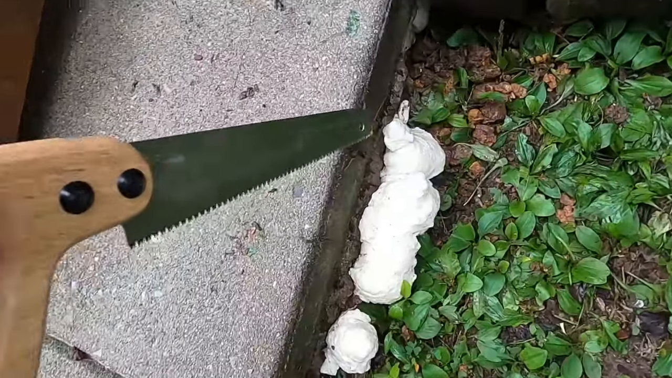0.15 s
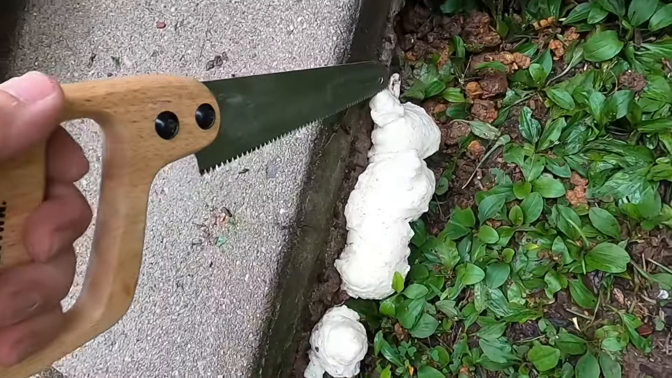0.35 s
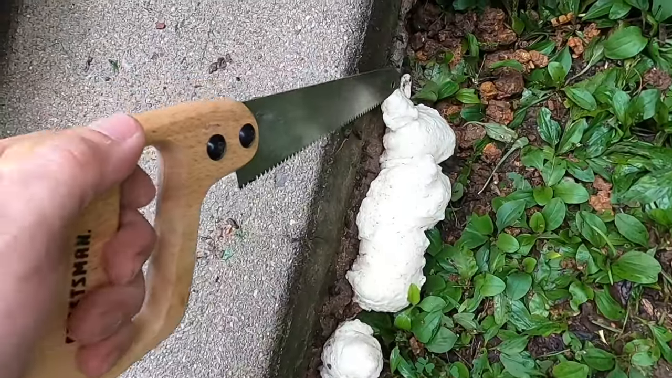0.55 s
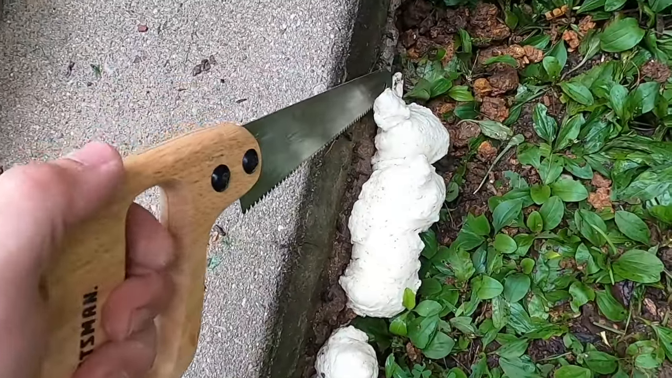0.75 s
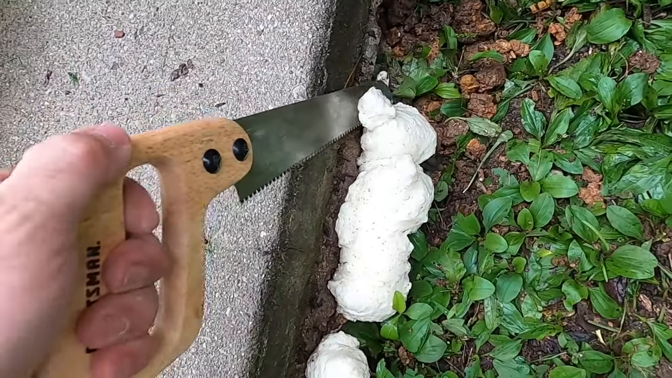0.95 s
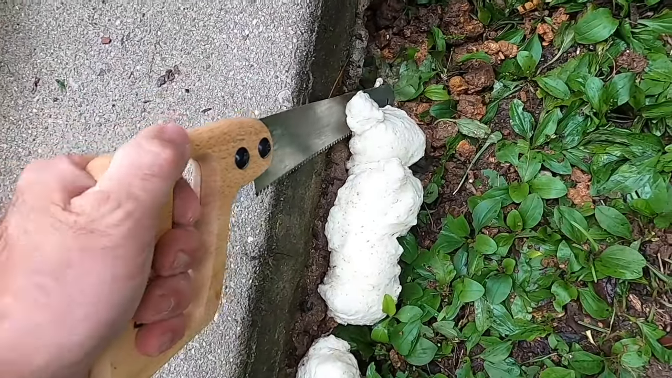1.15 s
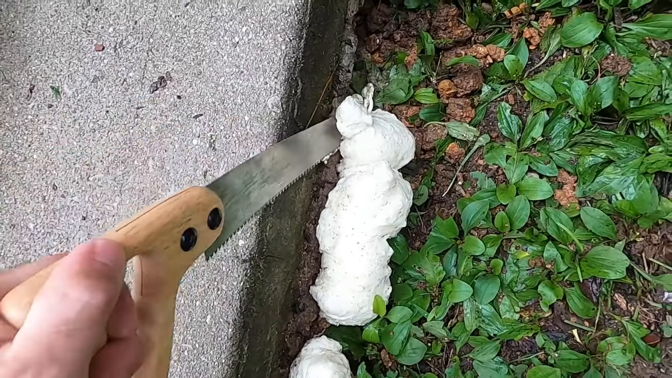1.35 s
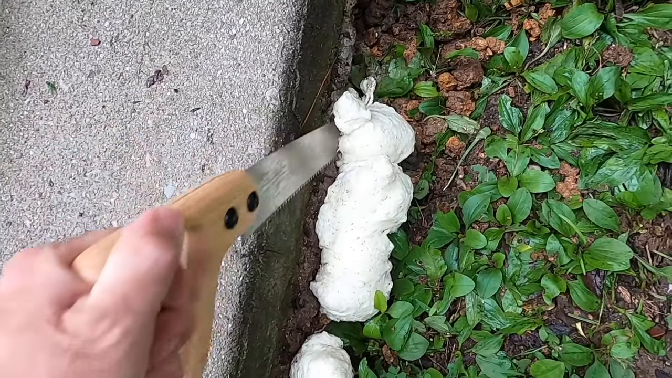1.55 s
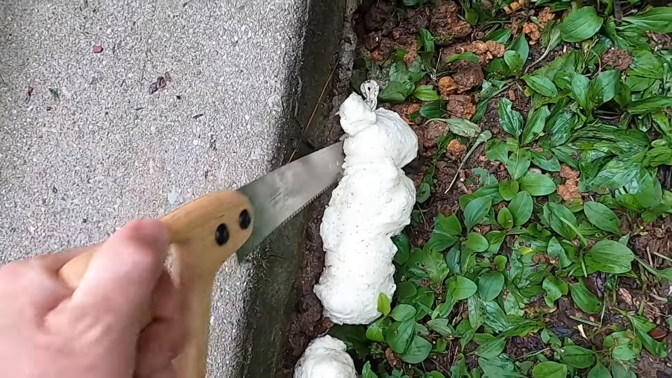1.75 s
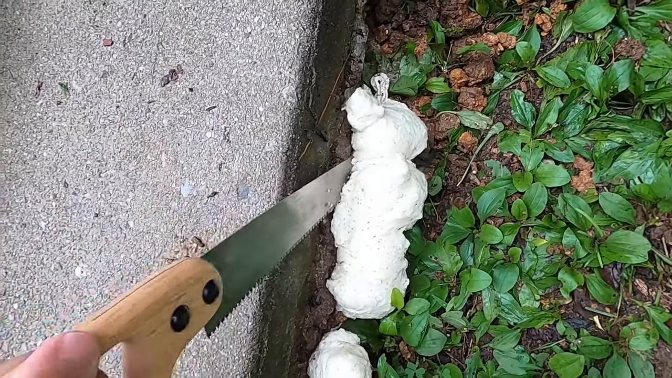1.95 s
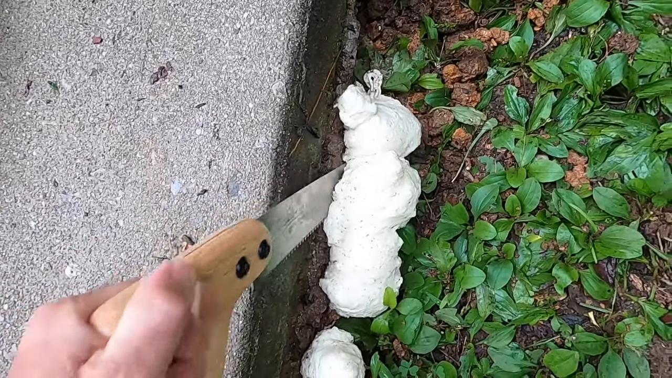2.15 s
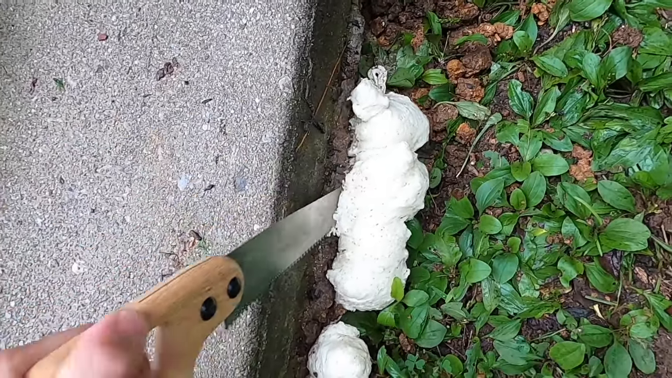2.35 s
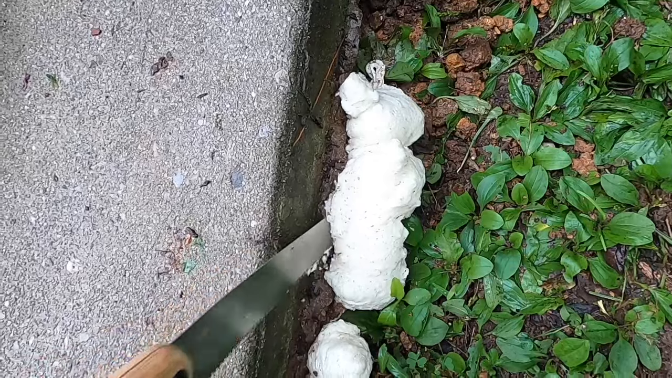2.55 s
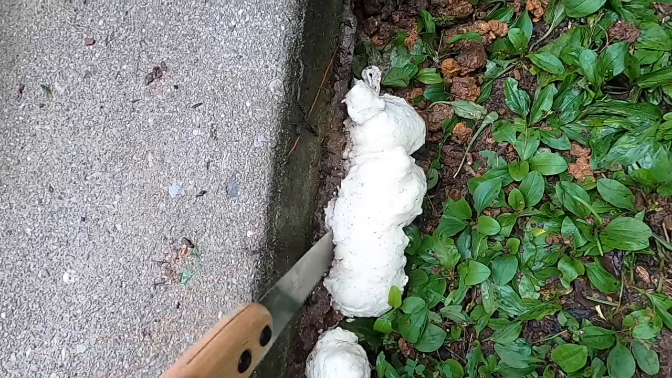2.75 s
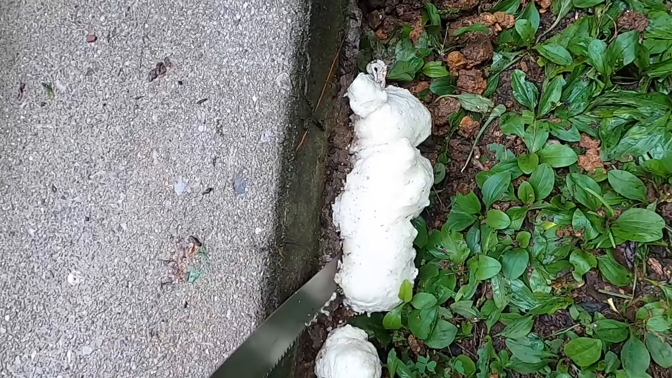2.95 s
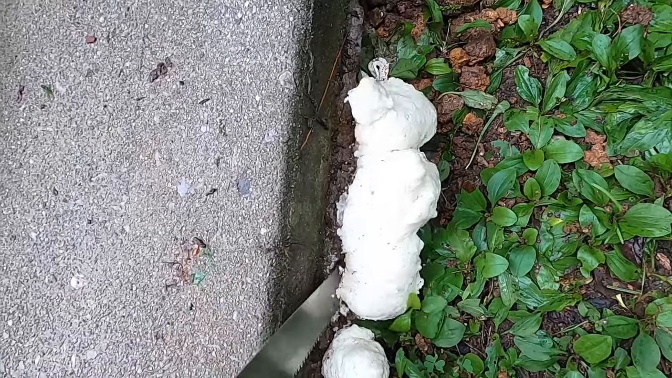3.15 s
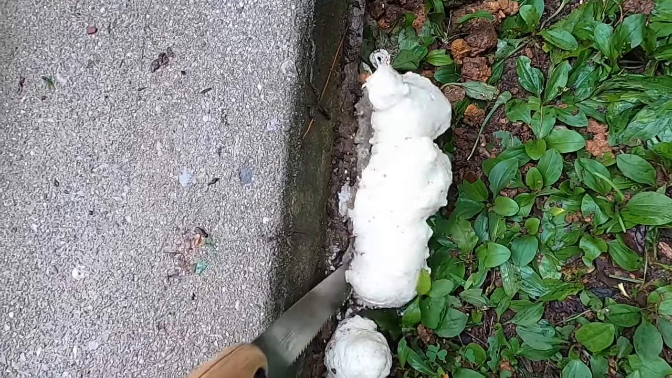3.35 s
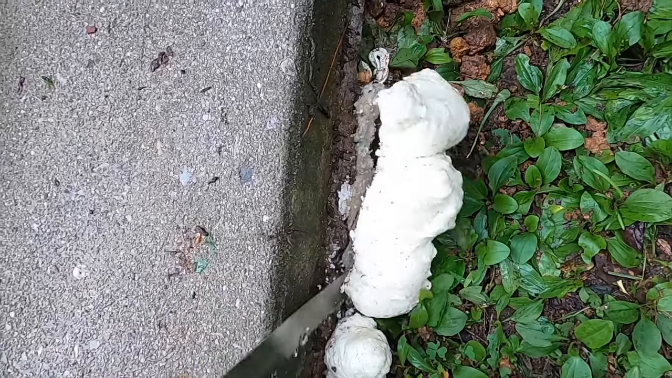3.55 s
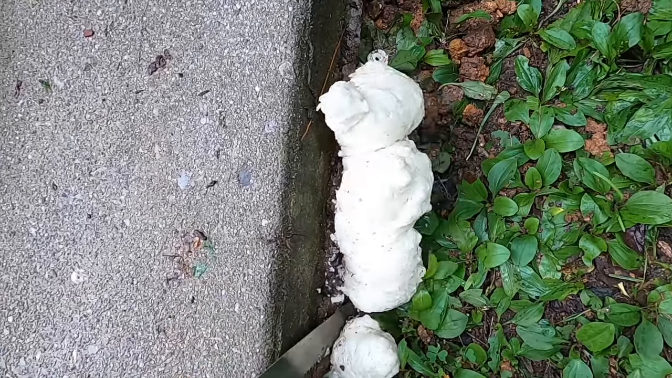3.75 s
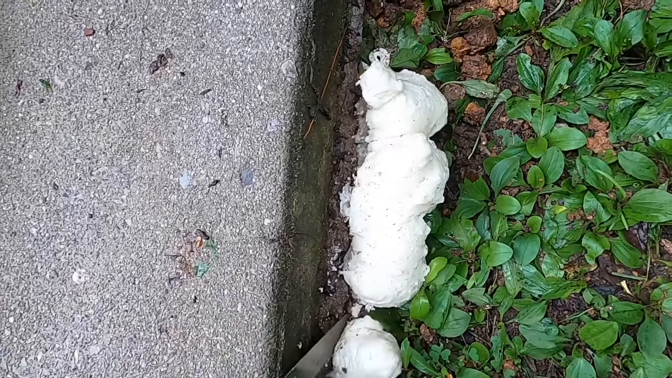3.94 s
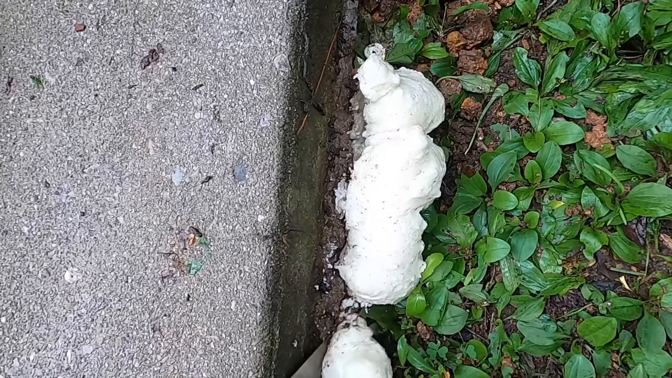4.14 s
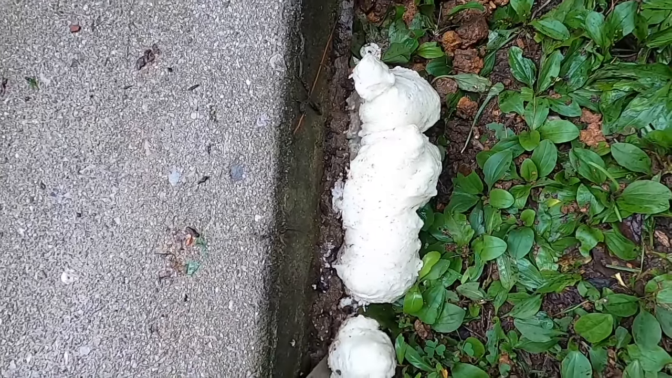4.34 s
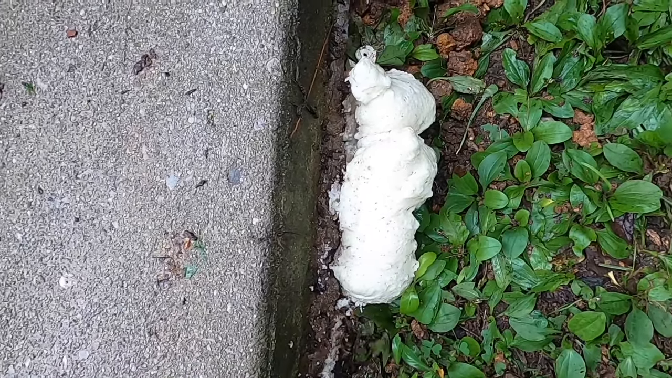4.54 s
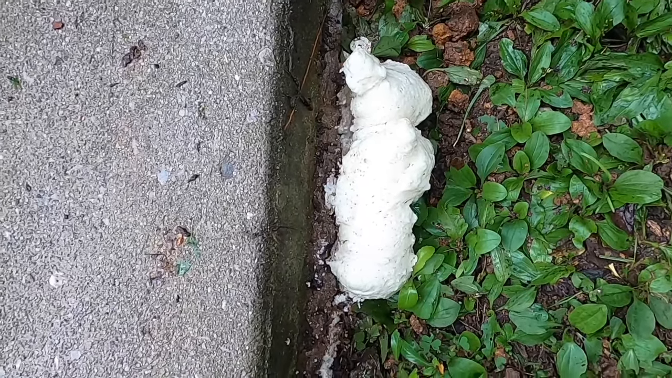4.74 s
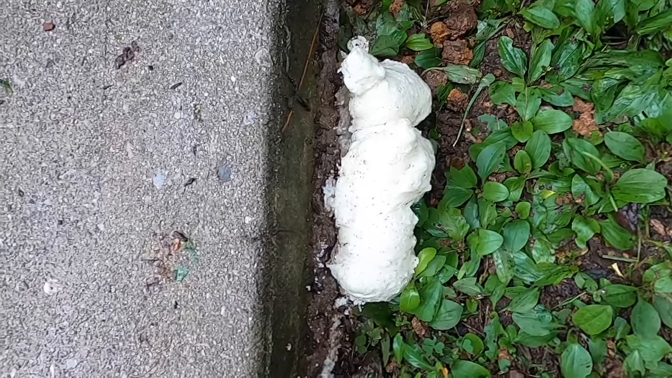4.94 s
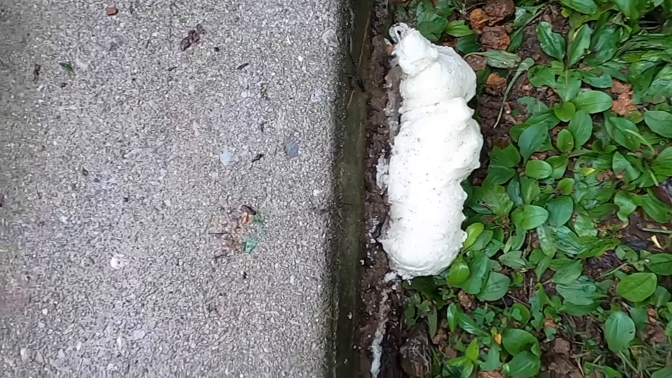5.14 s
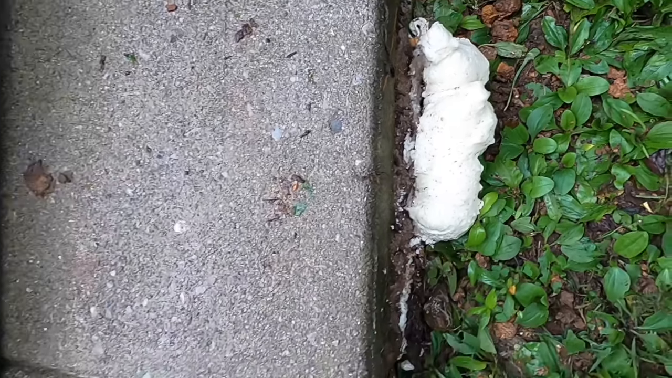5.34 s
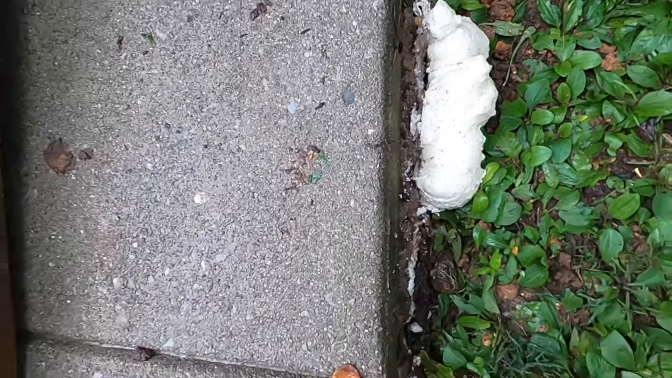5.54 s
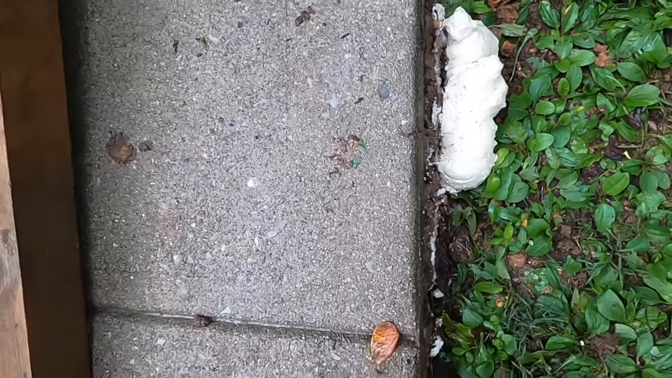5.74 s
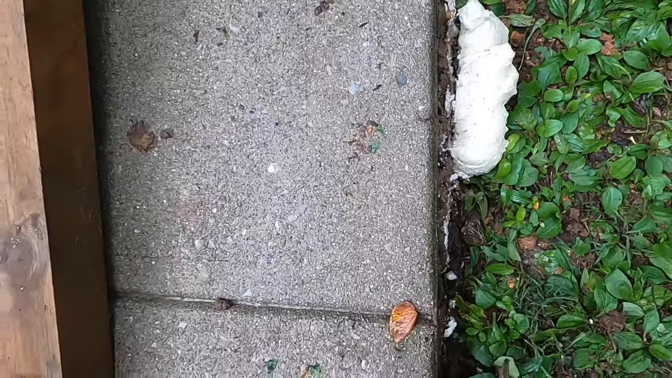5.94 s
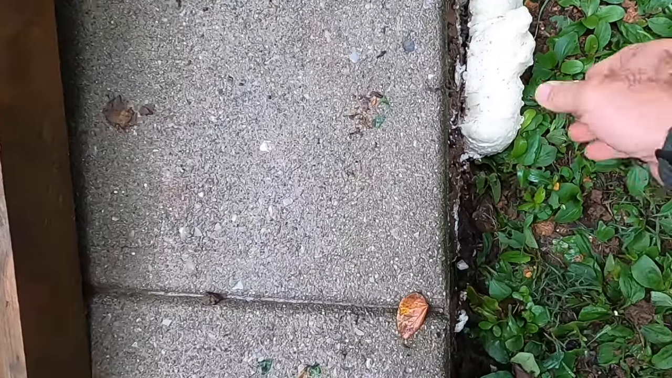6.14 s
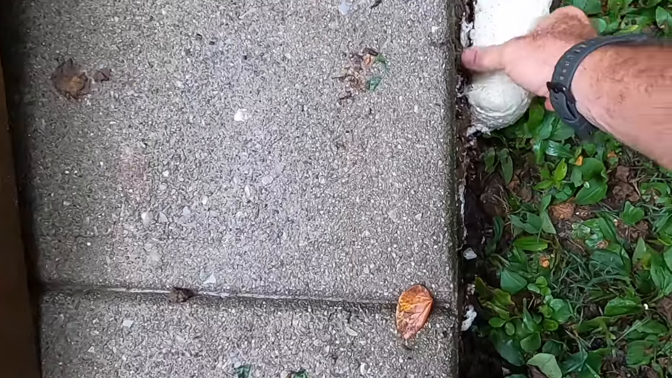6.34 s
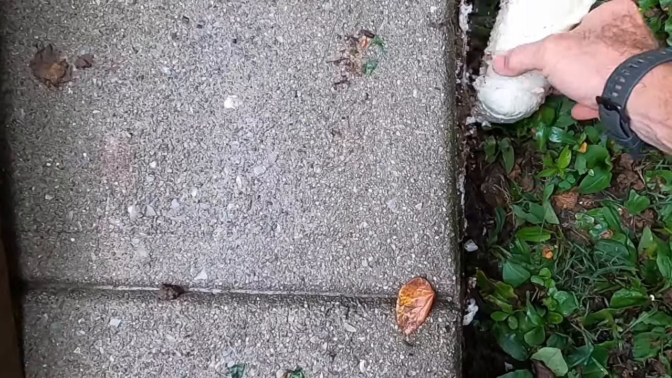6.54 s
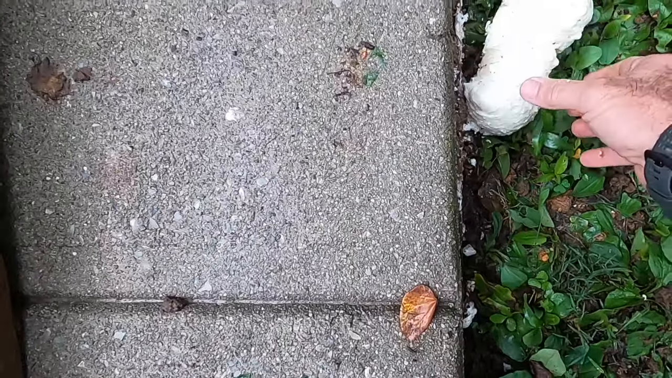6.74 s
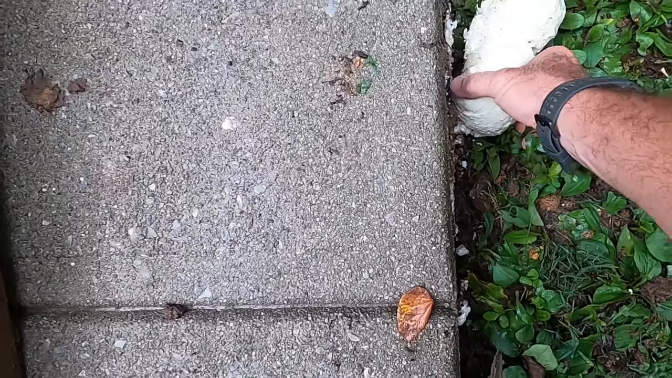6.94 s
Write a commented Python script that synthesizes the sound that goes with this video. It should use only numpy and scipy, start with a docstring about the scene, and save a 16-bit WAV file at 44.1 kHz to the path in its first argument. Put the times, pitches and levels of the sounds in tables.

```python
"""Beside a concrete path a handsaw cuts cured foam in quick strokes, close to the microphones.
Teeth tear the cells (random bursts through a body), the block judders and the steel rings (resonators);
short clicks (decaying sines) stand out, slips groan. Later come swishes, a scuff, a modal knock as the saw
is set down, fingers rubbing the foam and a squeak. Behind: shaped noise as far rumble and insect hiss; a
faint bird chirp of narrow gliding noise."""
import sys
import numpy as np
from scipy import signal
from scipy.fft import rfft, irfft
from scipy.io import wavfile
from scipy.ndimage import uniform_filter1d

SR = 44100
rng = np.random.default_rng(int(sys.argv[2]) if len(sys.argv) > 2 else 0)


def wav_out(sig):
    """Save sig, one row per channel (or a flat mono array), as 16-bit PCM at SR to the path in sys.argv[1]."""
    wavfile.write(sys.argv[1], SR, np.round(np.clip(np.atleast_2d(sig).T, -1, 1) * 32767).astype(np.int16))


N = 308259

# Saw strokes. Each row: bite in seconds, hold in seconds, level at the bite in dB, level at the end of the
# hold in dB, rise in seconds, fade in seconds, grit in dB, judder in dB, kerf resonance in Hz.
STROKE_ROWS = [(0.944, 0.013, -24.5, -22, 0.044, 0.012, 0, -10.5, 2500),
               (1.025, 0.15, -23.5, -27.5, 0.067, 0.043, -6, -9, 2500),
               (1.297, 0.043, -25.5, -24.0, 0.055, 0.083, -7, -3, 2120),
               (1.478, 0.059, -19.5, -19.5, 0.04, 0.044, -4.5, -13.5, 2330),
               (1.63, 0.067, -20, -19, 0.031, 0.062, -10, -7.5, 2260),
               (1.78, 0.056, -22.5, -19.5, 0.021, 0.07, -7.5, -9, 2690),
               (1.919, 0.1, -21.5, -21.5, 0.0075, 0.035, -4.5, -3, 2380),
               (2.119, 0.048, -21.5, -20.5, 0.061, 0.043, -10, -7, 2110),
               (2.26, 0.076, -21.5, -21.5, 0.036, 0.038, -9.5, -6.5, 1930),
               (2.433, 0.0048, -21.5, -20, 0.046, 0.08, -9, -4.5, 1400),
               (2.58, 0.021, -21.5, -22.0, 0.044, 0.082, -4.5, -3.5, 2290),
               (2.735, 0.044, -21, -28, 0.037, 0.049, 3.5, 3.5, 1490),
               (2.89, 0.092, -21.5, -25, 0.048, 0.013, -7.5, -11, 1870),
               (3.045, 0.053, -20.5, -23, 0.052, 0.047, -5.5, -6, 1440),
               (3.166, 0.028, -32, -36.5, 0.011, 0.0086, -12, -7.5, 3400),
               (3.205, 0.004, -23, -23, 0.017, 0.11, -19, -14, 3360),
               (3.349, 0.004, -38, -26.5, 0.012, 0.01, -16, -19.5, 2000),
               (3.393, 0.032, -22.5, -31.5, 0.033, 0.028, -23, -9, 2220),
               (3.481, 0.13, -31, -22.0, 0.013, 0.054, -5, -22, 3080),
               (3.694, 0.08, -26.5, -27, 0.014, 0.047, -1, -10, 3730),
               (3.856, 0.043, -29, -22, 0.031, 0.071, -5.5, -13, 3200),
               (4.059, 0.029, -18.5, -20, 0.05, 0.025, -7, -14, 2600),
               (4.167, 0.081, -24.0, -23, 0.038, 0.028, -9.5, -17.5, 2070),
               (4.338, 0.039, -21, -26, 0.049, 0.036, -5.5, -10.5, 2660),
               (4.453, 0.038, -31.5, -29, 0.031, 0.041, 0.5, -19.5, 4000),
               (4.542, 0.026, -33, -31.5, 0.012, 0.017, 8.5, -8, 3800)]
# Colour of torn cells. Each row: frequency in Hz, density in dB per Hz.
TORN_CELLS = [(210, -10), (350, -6), (602, -2), (777, -4), (1070, 2.5), (1810, 1.5), (3590, -1),
              (5890, -11.5), (6910, -9.5), (7600, -18), (8780, -17.5), (11000, -33.5), (12700, -26),
              (15800, -43)]


def amp(db):
    """Decibels to gain."""
    return 10 ** (np.asarray(db) / 20)


def even(x):
    """Scales to rms 1."""
    return x / np.sqrt(np.mean(x ** 2) + 1e-20)


def read(points, hz):
    """Reads a spectrum on a log-frequency axis."""
    f, value = np.transpose(points)
    return np.interp(np.log(hz + 1), np.log(f + 1), value)


def track(rows, index):
    """One column of a table over time; column 0 is seconds."""
    rows = np.array(rows)
    return np.interp(np.arange(N) / SR, rows[:, 0], rows[:, index])


def split(x, order, hz):
    """Parts below and above a Butterworth crossover."""
    return [signal.sosfilt(signal.butter(order, hz, kind, fs=SR, output="sos"), x) for kind in ("low", "high")]


def drift(samples, count):
    """Slow random curves of joint rms 1, held over 32-sample steps."""
    x = rng.standard_normal((count, N // 32 + 1))
    width = max(int(samples / 32), 1)
    smooth = even(uniform_filter1d(uniform_filter1d(x, width), width))
    return np.repeat(smooth, 32, axis=1)[:, :N]


def colour(x, points):
    """Causal minimum-phase filter with the given spectrum."""
    log_gain = np.log(amp(read(points, abs(np.fft.fftfreq(4096, 1 / SR)))))
    taps = np.fft.ifft(np.exp(np.conj(signal.hilbert(log_gain)))).real[:2048]
    return signal.oaconvolve(x, taps[None], axes=1)[:, :N]


def resonate(x, hz, width_hz):
    """Resonance on a moving pitch: shifts hz down to zero, smooths, shifts back."""
    turn = np.exp(2j * np.pi * np.cumsum(hz * np.ones(N)) / SR)
    r = np.exp(-np.pi * width_hz / SR)
    return 2 * (turn * signal.lfilter([1 - r], [1, -r], x / turn)).real


def patchy(x, depth_db, bins, frames):
    """Random time-frequency patches: small resonances come and go."""
    z = signal.stft(x, nperseg=512, noverlap=384)[2]
    patches = rng.standard_normal(z.shape[1:])
    patches = even(uniform_filter1d(uniform_filter1d(patches, int(bins), 0), int(frames), 1))
    return signal.istft(z * amp(depth_db * patches), nperseg=512, noverlap=384)[1][:, :N]


def crackle(per_s, spread_db, clump_db):
    """Cells burst at random with uneven sizes, in clumps a few milliseconds long."""
    size = amp(spread_db * np.minimum(rng.exponential(1, N), 3))
    bursts = size * (rng.random(N) < per_s / SR)
    clumps = np.tanh(drift(70, count=1)[0])
    return even(bursts * amp(clump_db * clumps) * rng.standard_normal((2, N)))


def scrape(grit_db, bursts, points):
    """Bursts through a body; grit lifts or lowers the part above 5500 Hz."""
    body = patchy(colour(bursts, points), depth_db=3.5, bins=2.8, frames=8.8)
    low, high = split(body, 4, 5500)
    return even(low) + amp(grit_db) * even(high)


def envelope(rows):
    """Each contact leans in dB through its hold; its edges are rounded, 20 dB down after the rise or fade time."""
    t, out = np.arange(N) / SR, np.zeros(N)
    for s, hold, first_db, last_db, rise, fade, *_ in rows:
        edge = np.maximum(s - t, 0) / rise + np.maximum(t - s - hold, 0) / fade
        out += amp(np.interp(t, (s, s + hold), (first_db, last_db)) - 20 * edge ** 2)
    return out


def held(rows, index, grows=0):
    """One value a contact, changing by grows through the hold and sliding on to the next."""
    rows = np.array(rows)
    s = np.stack([rows[:, 0], rows[:, 0] + rows[:, 1]], 1).ravel()
    value = np.stack([rows[:, index] - grows / 2, rows[:, index] + grows / 2], 1).ravel()
    return np.interp(np.arange(N) / SR, s, value)


def glides(rows):
    """Pitch and gain of short gliding notes whose level is one arch."""
    arch_db, bend = 22.5, .6  # ends this far under the top; bend under 1: the pitch moves most at first
    t, hz, gain = np.arange(N) / SR, np.zeros(N), np.zeros(N)
    for s, length, first_hz, last_hz, db in rows:
        u = (t - s) / length
        on = (u > 0) & (u < 1)
        hz += on * (first_hz + (last_hz - first_hz) * abs(u) ** bend)
        gain += on * amp(db - arch_db * np.minimum((2 * u - 1) ** 2, 1))
    return hz, uniform_filter1d(gain, 200)


def narrow_noise(hz, width_hz):
    """Noise through two equal resonances, a fuzzy tone of rms 1."""
    return even(resonate(resonate(rng.standard_normal(N), hz, width_hz), hz, width_hz))


def yard():
    """Far rumble and insect hiss: shaped noise with drifting time-frequency patches."""
    # Each row: frequency in Hz, density in dB per Hz.
    spectrum = [(12, -48.5), (30, -2.5), (52, -15), (67, 4), (85, -7.5), (150, -11), (230, -23.5),
                (450, -40), (700, -38), (1200, -32.5), (1700, -33.5), (2300, -44), (4500, -48), (5200, -42),
                (6700, -42.5), (7600, -57.5), (15800, -77)]
    # Each row: time in seconds, relative level in dB.
    level_rows = [(0, -44.5), (4.6, -47), (5.8, -44), (6.99, -47)]
    # Air above 400 Hz against the rumble. Each row: time in seconds, gain in dB.
    hiss_rows = [(0, 8), (.4, 4.5), (.75, 6.5), (4.7, 4.5), (5.4, 1.5), (5.65, 7), (6.05, 0), (6.6, 9),
                 (6.99, 1.5)]
    frames, hz = N // 512 + 5, np.fft.rfftfreq(2048, 1 / SR)
    a, b, c, d, patches = rng.standard_normal((frames, 1025, 5)).T
    patches = even(uniform_filter1d(uniform_filter1d(patches, 20, 0), 10, 1))
    z = np.array([a + 1j * b, c + 1j * d]) * amp(read(spectrum, hz)[:, None] + 2.24 * patches)
    air = even(signal.istft(z, nperseg=2048, noverlap=1536)[1][:, :N])
    rumble, hiss = split(air, 2, 400)
    return amp(track(level_rows, 1) + 3.5) * (rumble - amp(track(hiss_rows, 1)) * hiss)


def blade_ring():
    """The steel rings at its modes, each waxing and waning as the contact slides along it."""
    # Each row: frequency in Hz, relative bandwidth (scaled below), relative level in dB.
    modes = [(2080, 190, -21.5), (3180, 140, -2), (3617, 61, 1.5), (4280, 140, 1), (5060, 59.4, -25.5),
             (6190, 100, -5), (6860, 98, -9), (7300, 34, -5), (8570, 110, -7), (9400, 110, -16)]
    # Ring gain. Each row: time in seconds, level in dB.
    ring_rows = [(0.4, -21.5), (1.2, -14.5), (3.0, -21), (3.2, -0.5), (3.85, -0.5), (4.3, -9.5),
                 (4.7, -4.5)]
    drive = crackle(per_s=3100, spread_db=7.5, clump_db=-7.0)
    sway = np.tanh(drift(1500, count=2 * len(modes)))
    ring = 0
    for (hz, width, db), a, b in zip(modes, sway[::2], sway[1::2]):
        mode = resonate(drive, hz * (1 + 0.027 * b), 0.68 * width)
        ring = ring + amp(db + 13.0 * a) * mode * np.sqrt(100 / width)
    return even(ring) * amp(track(ring_rows, 1))


def touches(ring):
    """The blade lightly touches foam and leaves: sparse bursts plus its ring."""
    # Each row: start in seconds, hold in seconds, level in dB, level at the end in dB, rise in seconds,
    # fade in seconds, brightness in dB.
    touch_rows = [(0.442, 0.0094, -34, -40.5, .008, 0.012, -16.5),
                  (0.468, 0.0077, -29.5, -22.5, 0.01, 0.016, -18.5),
                  (0.512, 0.0053, -32.5, -32, .02, 0.026, -22.5),
                  (0.587, 0.084, -37, -46, 0.0069, 0.04, -0.5), (0.7, 0.13, -65.5, -63.5, .03, .03, 3.5),
                  (0.867, 0.0033, -33.5, -39.5, 0.0085, 0.023, 3.5), (4.6, 0.035, -43.5, -46, .01, .13, -4)]
    bursts = crackle(per_s=1700, spread_db=-1.0, clump_db=2.5)
    return envelope(touch_rows) * (scrape(held(touch_rows, 6), bursts, TORN_CELLS) + ring)


def clicks():
    """Short clicks during touches, sawing and foam handling: each a crack with its own colour and a puff of noise."""
    # Each row: time in seconds, relative peak in dB, colour in Hz.
    click_rows = [(0.446, -22.5, 1150), (0.48, -13, 1100), (0.585, -32.5, 4670), (0.692, -27, 1860),
                  (0.804, -28, 4870), (0.866, -33, 4440), (0.931, -9.5, 6330), (0.955, -12.5, 4650),
                  (1.03, -9.5, 5100), (1.053, -20.5, 1120), (1.337, -7.5, 2400), (1.771, -12.5, 3280),
                  (1.801, -8, 3030), (1.844, -7.5, 3730), (1.941, -11, 9400), (2.032, -15, 13000),
                  (2.083, -17, 6940), (2.388, -19, 6000), (2.446, -21, 1210), (2.609, -10, 3340),
                  (2.611, -2.5, 12300), (2.705, 3, 12500), (2.727, -7.5, 1060), (3.006, -9.5, 7000),
                  (3.018, -3, 6930), (3.2, -6, 3680), (3.345, -12, 1900), (3.373, -12.5, 1500),
                  (3.393, -18.5, 3570), (3.533, -9.5, 1930), (3.567, -5, 3640), (3.606, -12.5, 3160),
                  (3.628, -6.5, 3100), (3.717, 3, 8760), (3.745, 0, 8800), (4.488, -8.5, 3900),
                  (4.544, -15, 5030), (4.562, -7, 5140), (4.643, -26.5, 3500), (4.714, -41, 7020),
                  (4.744, -39, 1960), (4.79, -45, 1014), (4.899, -48.5, 1590), (5.477, -43.5, 3400),
                  (6.534, -34.5, 1930), (6.668, -11.5, 4000)]
    out, t = np.zeros((2, N + 2000)), np.arange(1500) / SR
    noise = rng.standard_normal((len(click_rows), 2, len(t)))
    for (s, db, hz), raw in zip(click_rows, noise):
        puff = signal.lfilter([1, -1], [1, -.6, .3], raw) * amp(-60 * t / 0.048)
        t60_s = min(0.0097, 30 / hz)
        crack = np.sin(2 * np.pi * hz * t) * amp(-60 * t / t60_s) * np.minimum(t / 0.00019, 1)
        out[:, round(s * SR):][:, :len(t)] += amp(db) * (crack + 0.18 * puff)
    soft = signal.lfilter([.5, .5], 1, out[:, :N])
    return signal.sosfilt(signal.butter(1, 7000, fs=SR, output="sos"), soft)


def fuzzy_tone():
    """A gliding tone of narrow noise before the cut."""
    # Each row: time in seconds, pitch in Hz, level in dB.
    whine_rows = [(.66, 1354, -73), (.72, 1360, -54), (.765, 1530, -54), (.81, 1440, -51.5),
                  (.86, 1300, -54), (.93, 1370, -55)]
    t = np.arange(N) / SR
    on = (t >= whine_rows[0][0]) & (t < whine_rows[-1][0])
    gain = amp(track(whine_rows, 2)) * uniform_filter1d(on * 1., 400)
    return gain * narrow_noise(track(whine_rows, 1), 110)


def tear():
    """Dense cell bursts through the foam body, plus the resonance of the kerf."""
    cells = crackle(per_s=16000, spread_db=2.0, clump_db=3.0)
    kerf_hz = held(STROKE_ROWS, 8)
    kerf = resonate(resonate(cells, kerf_hz, 2200), kerf_hz, 2300)
    return scrape(held(STROKE_ROWS, 6, grows=-0.5), cells, TORN_CELLS) + amp(-12.5) * even(kerf)


def judder():
    """The teeth stick and slip unevenly and shake the whole block."""
    hz = 200 * np.exp(0.19 * drift(2500, count=1)[0])
    drive = crackle(per_s=900, spread_db=0.5, clump_db=-2.0)
    shake = even(resonate(resonate(drive, hz, 200), hz, 270))
    shake = shake + amp(-2.5) * even(resonate(drive, 394, 250.4))
    return amp(held(STROKE_ROWS, 7, grows=-1.5)) * even(shake)


def groan():
    """The slips lock into a rising pitch: harmonics with a strong second."""
    # Each row: start in seconds, length in seconds, first pitch in Hz, last pitch in Hz, relative level in dB.
    groan_rows = [(1.235, .14, 170, 310.7, -25), (2.425, 0.068, 130, 222, -30),
                  (2.72, 0.065, 95, 198, -30.5)]
    hz, gain = glides(groan_rows)
    turns = np.cumsum(hz * (1 + 0.065 * drift(150, count=1)[0])) / SR
    harmonics_db = (3.5, 2.5, -11.5, -9.0)
    return gain * sum(amp(db) * np.cos(2 * np.pi * k * turns) for k, db in enumerate(harmonics_db, 1))


def saw():
    """Light touches and strokes share one blade ring; strokes add tearing and judder, groans lie on top."""
    ring = blade_ring()
    stroke = envelope(STROKE_ROWS) * (amp(-2.5) * tear() + ring + judder())
    return touches(ring) + stroke + groan()


def rustles():
    """Faint soft swells of bright noise."""
    # Each row: centre in seconds, level in dB, length in seconds.
    swishes = [(4.787, -62.5, 0.027), (5.034, -62, 0.088), (5.173, -57, 0.055), (5.398, -59.5, 0.072),
               (5.64, -68, 0.064), (6.833, -62.5, 0.05)]
    t = np.arange(N) / SR
    swell = sum(amp(db) * np.exp(-((t - s) / (length / 2)) ** 2) for s, db, length in swishes)
    spectrum = [(300, 0), (1500, -17), (4000, -4), (9000, -14.5), (14000, -35)]  # Hz, dB
    return swell * even(colour(crackle(per_s=8000, spread_db=5.0, clump_db=-4.5), spectrum))


def scuff():
    """A soft low scuff: noise through two resonance pairs."""
    # Each row: start in seconds, hold in seconds, level in dB, level at the end in dB, rise in seconds,
    # fade in seconds.
    scuff_rows = [(5.362, 0.031, -46, -44.5, 0.022, 0.039)]
    noise = rng.standard_normal(N)
    low = resonate(resonate(noise, 260, 180), 290, 161)
    upper = resonate(resonate(noise, 520, 400), 650, 400)
    return envelope(scuff_rows) * even(low + 0.13 * upper)


def knock():
    """The saw is set down: crack, thump and duller rattle ring the wooden handle and the step, to the right."""
    # Each row: time in seconds, relative peak in dB, contact decay in seconds, tilt in dB per octave.
    blows = [(5.761, -8.5, 0.0023, 4), (5.764, -4, .003, 1.5), (5.794, -19.5, 0.074, -3)]
    # Each row: frequency in Hz, relative level in dB, t60 in seconds.
    wood_modes = [(66.7, -7, 0.098), (148.2, 14.5, 0.028), (275, 8.5, 0.09), (550, 3, 0.018),
                  (674, 4.5, 0.069), (765, 2.5, 0.051), (910, -9, 0.025), (1220, 9, 0.011),
                  (1767, 0, 0.0061), (2745, -2.5, 0.012), (4530, -10, .008), (6070, -8.5, 0.0061)]
    out, t = np.zeros((2, N)), np.arange(SR // 2) / SR
    for s, db, contact, tilt_db in blows:
        ring = sum(amp(d + tilt_db * np.log2(hz / 200) - 60 * t / t60) * np.sin(2 * np.pi * hz * t)
                   for hz, d, t60 in wood_modes)
        rough = rng.standard_normal(len(t)) + 0.31 * rng.standard_normal((2, len(t)))
        blow = rough * np.exp(-t / contact)
        blow[:, 0] += 3.  # the first contact
        hit = signal.fftconvolve(blow, ring[None], axes=1)[:, :len(t)]
        out[:, round(s * SR):][:, :len(t)] += amp(db) * hit / abs(hit).max()
    # the left port lags by about an eighth of a cycle and hears less of the thump
    left = np.imag(signal.hilbert(out[0])) * 0.87 + out[0] * 0.86
    left = signal.lfilter(*signal.butter(1, 90, "high", fs=SR), left)
    return signal.lfilter(*signal.butter(2, 7000, fs=SR), np.array([amp(-2.5) * left, out[1]]))


def bird():
    """A faint chirp: narrow noise on a gliding pitch."""
    # Each row: start in seconds, length in seconds, first pitch in Hz, last pitch in Hz, top level in dB.
    chirp_rows = [(5.82, .22, 3400, 3330, -53)]
    hz, gain = glides(chirp_rows)
    return gain * narrow_noise(hz + 1, 120)


def fingers():
    """Fingers rub and lift the foam: dense bursts through a duller body."""
    # Each row: start in seconds, hold in seconds, level in dB, level at the end in dB, rise in seconds,
    # fade in seconds, brightness in dB.
    finger_rows = [(6.385, 0.067, -42.5, -43.5, 0.0155, .014, -19),
                   (6.525, 0.017, -57.5, -44, .02, 0.028, -11),
                   (6.595, 0.077, -39.5, -30, 0.02, 0.071, -6.5),
                   (6.669, 0.019, -25, -29, 0.0054, 0.012, -11), (6.95, 0.038, -59, -55, .03, .05, -7)]
    # Colour of rubbed foam. Each row: frequency in Hz, density in dB per Hz.
    rubbed_foam = [(240, -15.5), (400, -25.5), (1050, -22), (1390, -15.5), (1500, -16.5), (1780, -10),
                   (2420, -15.5), (4090, -22), (8300, -42), (15800, -64)]
    bursts = crackle(per_s=11000, spread_db=1.5, clump_db=4.0)
    return envelope(finger_rows) * scrape(held(finger_rows, 6), bursts, rubbed_foam)


def squeak():
    """The foam squeaks as it comes loose: narrow noise on a falling pitch."""
    # Each row: start in seconds, length in seconds, first pitch in Hz, last pitch in Hz, relative level in dB.
    squeak_rows = [(6.675, .035, 2300, 1450, -20)]
    hz, gain = glides(squeak_rows)
    return gain * narrow_noise(hz + 1, 250)


def ports(pair, same, near):
    """Two microphone ports from two unrelated draws of one sound; near scales the left-right offset."""
    # Each row: frequency in Hz, left minus right in dB.
    lean_rows = [(6000, 0), (9000, 0), (13000, -5.5)]
    # Each row: frequency in Hz, phase by which left leads in radians.
    lead_rows = [(100, 0.25), (1000, -0.17), (8500, -0.44), (11500, -0.63)]
    hz, (a, b) = np.fft.rfftfreq(N, 1 / SR), rfft(pair)
    c = np.clip(read(same, hz), -1, 1)
    lean = (amp(read(lean_rows, hz)) * np.exp(1j * read(lead_rows, hz))) ** (near / 2)
    return irfft(np.array([a * lean, (c * a + np.sqrt(1 - c ** 2) * b) / lean]), N)


def scene():
    """Everything close by over the yard."""
    # Left-right likeness. Each row: frequency in Hz, correlation from 0 to 1.
    same_near = [(60, 1), (600, 0.94), (3500, 1), (7000, 0.83), (10000, 0.41), (15000, .4)]
    # As above, for the yard: frequency in Hz, correlation from 0 to 1.
    same_yard = [(60, 0.97), (500, 0.97), (3000, .65), (6000, 0.49), (15000, .4)]
    near = saw() + clicks() + fuzzy_tone() + rustles() + scuff() + bird() + fingers() + squeak()
    near = signal.sosfilt(signal.butter(2, 90, "high", fs=SR, output="sos"), near)
    return ports(near, same_near, near=1.0) + knock() + ports(yard(), same_yard, near=0)


def record(dry):
    """The stereo width moves in two bands below the top; then a low-pass limits the band."""
    # Side gain. Each row: time in seconds, bass width in dB, middle width in dB.
    width_rows = [(0, -38, -22), (.9, -28, -28), (1.3, -15.5, -51), (2.15, -9.5, -31), (2.3, -10, -6.5),
                  (2.98, -3, -4.5), (3.05, -7, -42), (3.3, -7.5, -38), (3.4, -3, -6), (4.6, 1.5, 3),
                  (5.95, 7.5, 2.5), (6.3, -25, -21), (6.99, -40, -59)]
    # Upper edges of bass and middle, in Hz.
    knees_hz = (900, 9900)
    mid, side = (dry[0] + dry[1]) / 2, (dry[0] - dry[1]) / 2
    spectrum, hz = rfft(side), np.fft.rfftfreq(N, 1 / SR)
    bass, below_top = (irfft(spectrum * (hz < knee_hz), N) for knee_hz in knees_hz)
    top, middle = side - below_top, below_top - bass
    side = top + amp(track(width_rows, 1)) * bass + amp(track(width_rows, 2)) * middle
    edge = signal.firwin(511, 15750, window=("kaiser", 9), fs=SR)
    return signal.oaconvolve(np.array([mid + side, mid - side]), edge[None], "same")


dry = scene()
out = record(dry)
wav_out(out)
```